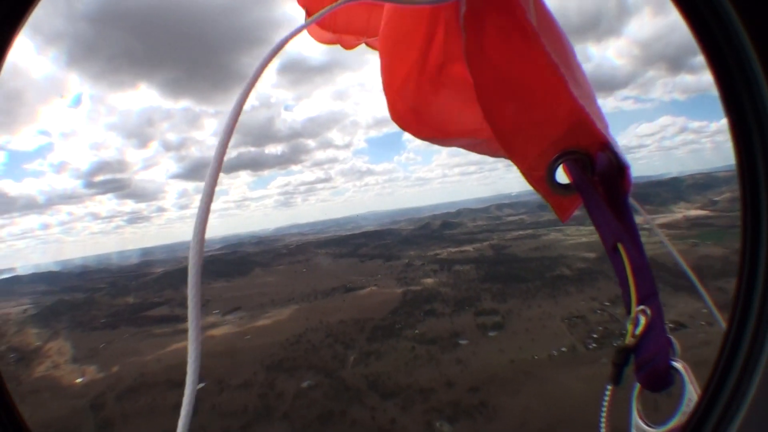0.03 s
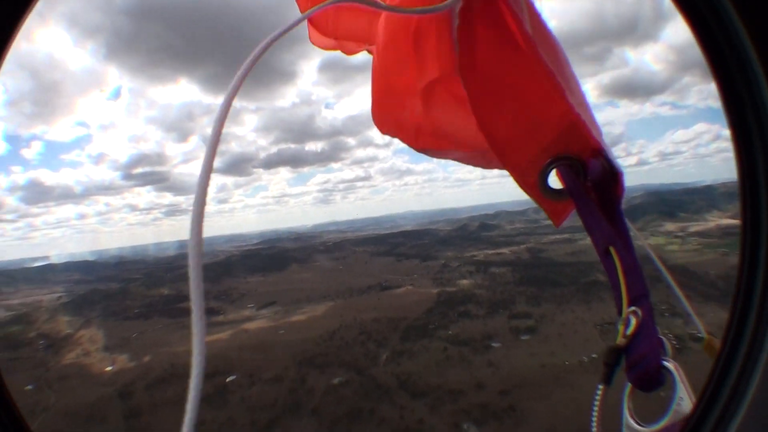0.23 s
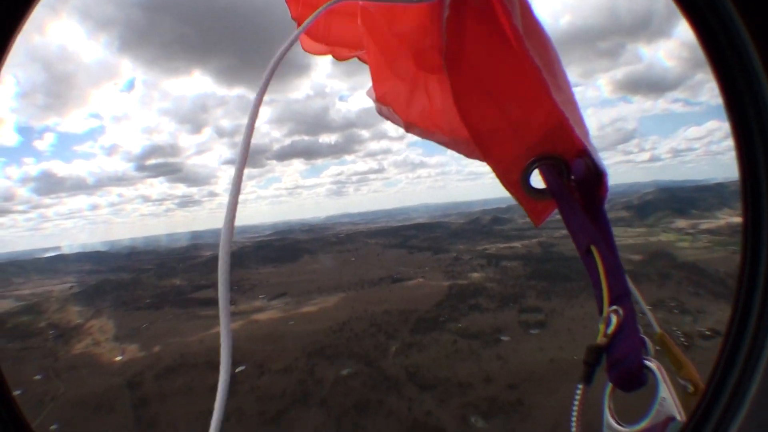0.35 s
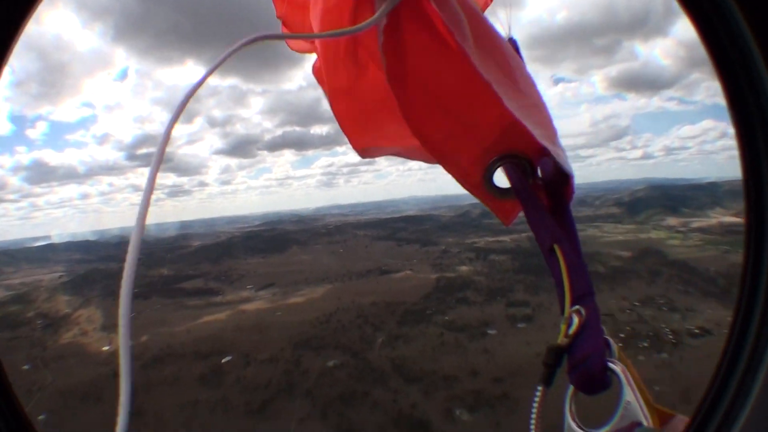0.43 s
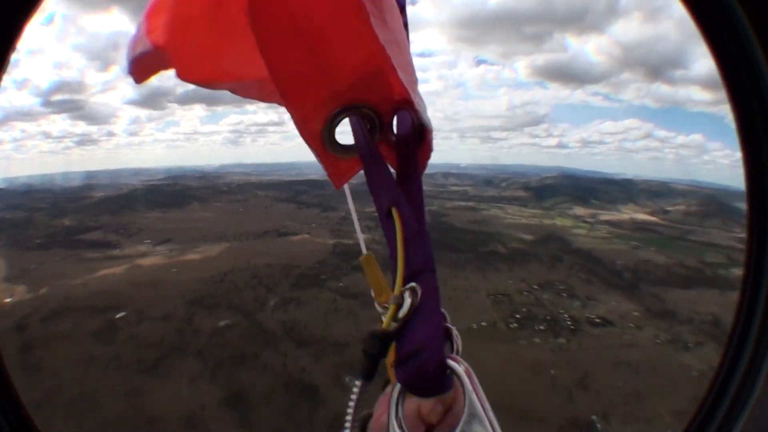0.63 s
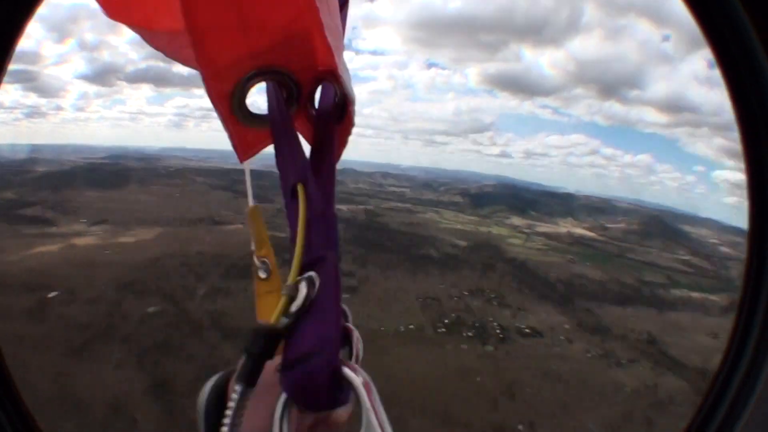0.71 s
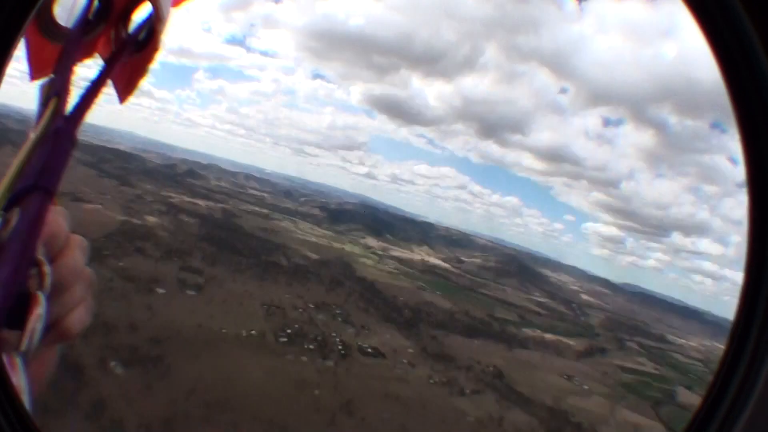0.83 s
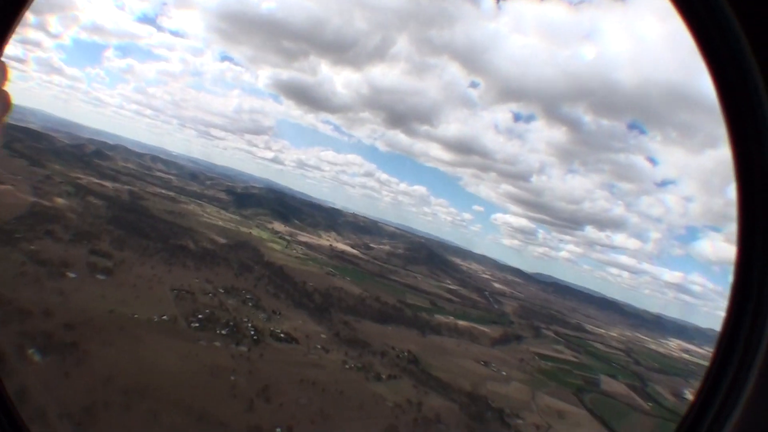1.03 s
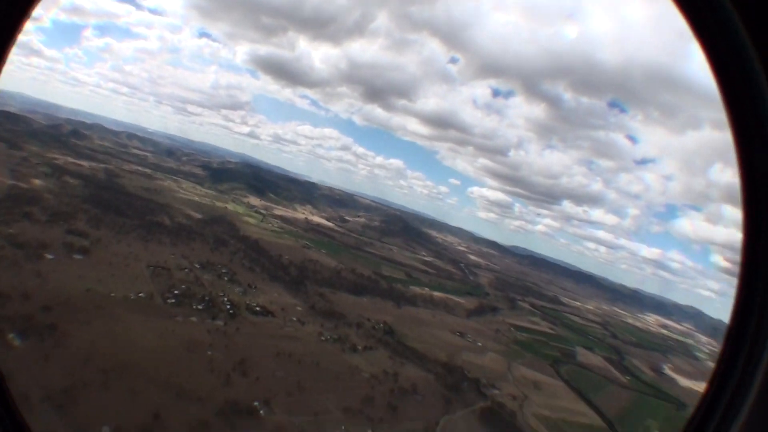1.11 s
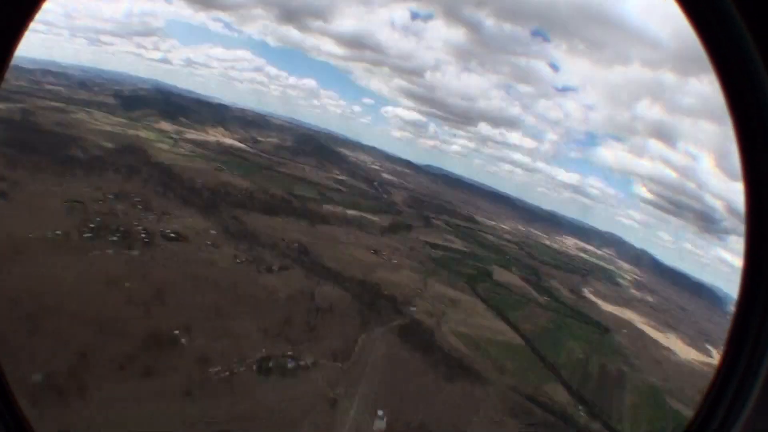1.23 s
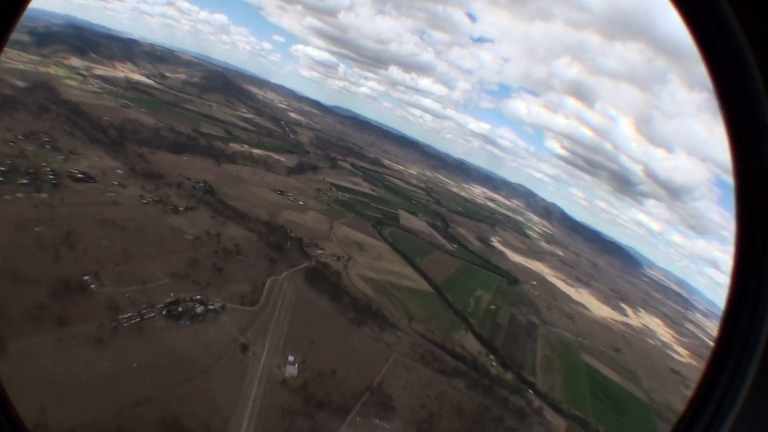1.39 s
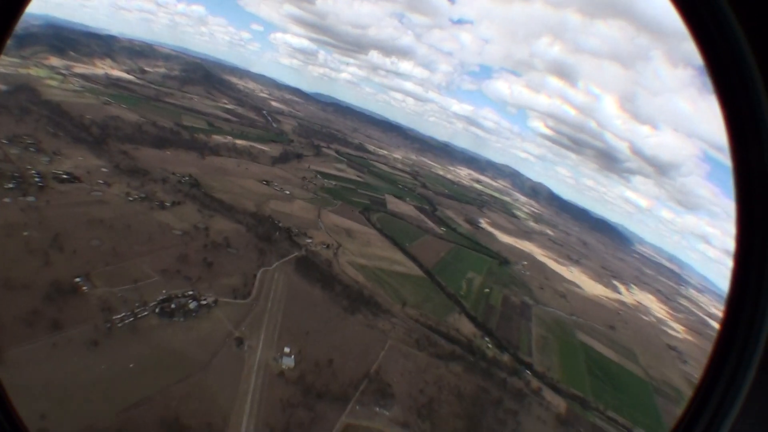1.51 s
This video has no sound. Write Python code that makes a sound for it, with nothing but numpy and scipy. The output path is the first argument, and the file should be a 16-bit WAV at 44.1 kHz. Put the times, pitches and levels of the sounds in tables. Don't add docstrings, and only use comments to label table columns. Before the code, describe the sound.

Wind on a camera worn under a parachute: low lumpy buffeting with buckle ticks and cloth rustles, then a sudden broad roar with bright fizz, easing into a falling whistle over soft hiss, in open sky.

```python
import sys
import numpy as np
from scipy import signal
from scipy.fft import irfft
from scipy.io import wavfile
from scipy.ndimage import uniform_filter1d

SR = 44100
rng = np.random.default_rng(int(sys.argv[2]) if len(sys.argv) > 2 else 0)


def elevation(decibels):
    levels = np.asarray(decibels, float)
    return 10 ** (levels / 20)


def put_to_file(sound):
    columns = np.atleast_2d(sound).T
    safe = np.clip(columns, -1, 1)
    whole_steps = np.round(safe * 32767)
    wavfile.write(sys.argv[1], SR, whole_steps.astype(np.int16))


N = 68355

# start_s, buffeting_db, eddy_speed_ratio, blast_db, blast_brightness_db_per_octave
AIRFLOW = [(0, -34, 1, -72, -2), (.1, -29, 0.9, -72, 0), (.18, -29, 0.71, -70, 0), (.24, -27, 1.27, -55, 2),
           (.34, -28, 0.59, -53.5, 7), (.44, -24.5, 0.81, -40.5, 4), (.5, -25.5, 1.1, -54, 9),
           (.56, -16.5, 2, -21, -4.5), (.61, -14, 2.9, -14, -1.4), (.66, -13.5, 1.74, -16, -1.7),
           (.72, -18.5, 2.45, -16, 1), (.79, -24.5, 1.3, -11.5, -1.5), (.87, -18, 3.3, -13.5, -1.5),
           (.95, -19.5, 1.73, -14.5, -1.13), (1.15, -28.5, 1.3, -15, -1.33), (1.2, -30, 1.8, -22.5, 0.5),
           (1.27, -33.5, 1.4, -24, -1.6), (1.38, -35.5, 1.6, -34, 0.5), (1.55, -38, 0.79, -35, 0)]
# start_s, share_of_wobble_removed (0-1)
EDGE_STEADINESS = [(1.15, .3), (1.4, .7)]
EDGE_WIDTH_HZ, EDGE_SIDE_DB = 155, 1


def evened(x):
    return x / np.sqrt(np.mean(x ** 2) + 1e-20)


def read(points, hz):
    f, value = np.transpose(points)
    return np.interp(np.log(hz + 1), np.log(f + 1), value)


def curve(table, t, axis):
    rows = np.array(table)
    return np.interp(t, rows[:, 0], rows[:, axis])


def air(spectrum, same, size, patchy_db, flicker_db, tilt=None, speed=None, lead=((1, 0), (2, 0))):
    hop = size // 4
    frames = N // hop + 5
    hz = np.fft.rfftfreq(size, 1 / SR)[:, None]
    s = np.arange(frames) * hop / SR
    a, b, c, d, patches = rng.standard_normal((frames, len(hz), 5)).T
    patches = uniform_filter1d(patches, size=size // 100, axis=0)
    patches = evened(uniform_filter1d(patches, size=2600 // hop, axis=1))
    flicker = evened(uniform_filter1d(rng.standard_normal(frames), size=1 + 500 // hop))

    like = np.clip(read(same, hz), -1, 1)
    left = a + 1j * b
    shared = like * left * np.exp(-1j * read(lead, hz))
    z = np.array([left, shared + np.sqrt(1 - like ** 2) * (c + 1j * d)])

    stretch = 1 if speed is None else np.maximum(speed(s), .3)
    shape = elevation(read(spectrum, hz / stretch)) * (hz > 0)
    z *= shape / np.sqrt(np.mean(shape ** 2, axis=0))
    z *= elevation(patchy_db * patches + flicker_db * flicker)
    scale = np.sqrt(np.mean(signal.istft(z, nperseg=size, noverlap=size - hop)[1] ** 2))
    if tilt is not None:
        octaves_up = np.log2(np.maximum(hz / 1500, 1))
        z *= elevation(octaves_up * tilt(s))
    return signal.istft(z, nperseg=size, noverlap=size - hop)[1][:, :N] / scale


def bursts(t, s, length):
    return np.sin(np.pi * np.clip((t - s) / length, 0, 1)) ** 2


def vortex_tone(t, table, width_hz, side_db, steady):
    waver = evened(uniform_filter1d(rng.standard_normal(N), size=700))
    pitch_hz = curve(table, t, axis=1) * (1 + .022 * waver)
    turn = np.exp(2j * np.pi * np.cumsum(pitch_hz) / SR)

    r = np.exp(-np.pi * width_hz / SR)
    noise = rng.standard_normal((2, N)) + 1j * rng.standard_normal((2, N))
    drift = signal.lfilter([1], np.convolve([1, -r], [1, -r]), noise)
    spread = np.mean(drift.real ** 2)

    removed = curve(steady, t, axis=1)
    tone = np.sqrt(2) * (turn * drift / abs(drift) ** removed).real
    mid, side = tone * (2 * spread) ** ((removed - 1) / 2)
    sounding = (t > table[0][0]) * (t <= table[-1][0])
    level = sounding * elevation(curve(table, t, axis=2))
    return level * np.array([mid + elevation(side_db) * side, mid - elevation(side_db) * side])


def canopy_hiss():
    # pitch_hz, level_db (per Hz)
    spectrum = [(800, 5), (2000, -5), (3200, -4), (5000, -4), (8000, -13.5), (11500, -20.5), (15500, -33)]
    # pitch_hz, left_right_likeness (0-1)
    same = [(800, 1), (3000, 0.86), (15000, 0.56)]
    return elevation(-37) * air(spectrum, same, size=512, patchy_db=1.4, flicker_db=1.3)


def rustle(t):
    # start_s, length_s, level_db, thin_crackle_share (0-1)
    rubs = [(0.104, 0.008, -41, .2), (0.135, 0.0033, -33, 0.05), (0.14, 0.0095, -46, 0.3),
            (0.148, .01, -43, 1), (0.208, 0.039, -43.5, 0.44), (.238, .008, -38, .1), (.314, .016, -39, .1),
            (.343, .006, -38, .2), (0.382, 0.0046, -36, .1), (0.397, .012, -31.5, 0.57),
            (0.421, 0.0088, -36, 0.6), (0.434, .016, -31, 0.36), (0.449, 0.021, -29, 0.27),
            (0.473, 0.019, -31, .4), (0.498, 0.0041, -34, 0.1), (0.517, 0.03, -33, 0.35),
            (0.541, 0.0097, -32.5, 0.6), (0.556, 0.0041, -23.5, 0.25), (.571, 0.015, -34, .4),
            (0.594, 0.0061, -27, 0.7), (0.598, 0.048, -26.5, 0.9)]
    # pitch_hz, level_db (per Hz)
    dull_spectrum = [(1500, 7.5), (2800, 14.5), (5000, 8), (9000, -11.5), (13000, -30), (16000, -42)]
    # pitch_hz, level_db (per Hz)
    thin_spectrum = [(2500, -7), (6000, 3.5), (10000, -1), (13500, -18), (16000, -28)]
    snaps = rng.random(N) < 8000 / SR
    snaps = snaps * elevation(2.6 * np.minimum(rng.exponential(1, N), 3))
    snaps = snaps * rng.choice([-1, 1], N)
    hz = np.fft.rfftfreq(128, 1 / SR)

    def coloured(spectrum):
        ring = np.roll(irfft(elevation(read(spectrum, hz))), 64) * np.hanning(128)
        return evened(np.convolve(snaps, ring, "same"))

    dull, thin = coloured(dull_spectrum), coloured(thin_spectrum)
    cloth = np.zeros(N)
    for s, length, db, share in rubs:
        mix = dull + np.clip(share, 0, 1) * (thin - dull)
        cloth += elevation(db) * np.sqrt(bursts(t, s, length)) * mix
    return np.array([cloth, 0.98 * cloth + 0.079 * np.roll(cloth, 40)])


def ticks():
    # start_s, peak_db, centre_hz, spread_octaves
    knocks = [(.0977, -17, 8000, 1.1), (.1407, -15.5, 7500, .8), (.1427, -17, 5000, .45),
              (.1862, -26, 4000, 1), (.234, -21, 3200, .9), (.248, -24, 4500, .5), (.3245, -23, 3800, .6),
              (.345, -29, 6500, .6), (.378, -22, 4500, .6), (.4328, -21, 4000, .9), (.456, -25, 4500, .7),
              (.4603, -15.5, 4200, .7), (.4965, -31, 10000, .5), (.516, -21, 3200, .5),
              (.547, -26, 8000, .8), (.5585, -22, 3800, .7), (.6205, -20, 10000, .8),
              (1.4443, -33, 14000, .5)]
    t60_s, rise_s = .0045, .00015
    out, t = np.zeros(N), np.arange(600) / SR
    for (s, db, centre, spread), luck in zip(knocks, rng.random((len(knocks), 3, 30, 1))):
        f = np.geomspace(1800, 15000, 30)[:, None] * (.96 + .08 * luck[0])
        weight = np.exp(-(np.log2(f / centre) / spread) ** 2 / 2)
        decay = elevation(-60 * t / (t60_s * (.5 + luck[1])))
        ring = (weight * decay * np.cos(2 * np.pi * f * t - 4 * luck[2])).sum(0)
        ring *= 1 - np.exp(-(t / rise_s) ** 2)
        part = out[round((s - rise_s) * SR):][:len(t)]
        part += (elevation(db) * ring / abs(ring).max())[:len(part)]
    return out * elevation([[-1.1], [1.1]])


def puffs(t):
    # middle_s, level_db, length_s, left_right_db
    gusts = [
        (0.025, -23.5, 0.034, 2),
        (0.197, -29, 0.04, 1),
        (0.237, -27, 0.078, -5),
        (0.285, -29, 0.047, -2),
        (0.358, -25, 0.052, -2.5),
        (0.415, -23.5, 0.0074, 16),
        (0.441, -26, 0.07, -4.5),
        (0.517, -43, 0.016, -5),
    ]
    # pitch_hz, level_db (per Hz)
    spectrum = [(100, 9.5), (400, 10), (900, -2.5), (1500, -1.5), (2500, -44)]
    level = 0
    for s, db, length, pan in gusts:
        ports = elevation(db + np.array([[pan], [-pan]]) / 2)
        level = level + ports * bursts(t, s - length / 2, length)
    opposed = [(100, -0.77), (1500, -0.63)]  # pitch_hz, left_right_likeness
    return level * air(spectrum, opposed, size=512, patchy_db=0.0, flicker_db=3.5)


def fizz(t):
    # start_s, level_db
    flare = [(0, -64), (.38, -58), (.58, -56), (.618, -39), (.65, -33.5), (.694, -33), (.75, -33),
             (.768, -40), (.802, -32), (.87, -33.5), (.95, -45), (1.2, -52), (1.3, -46), (1.42, -58),
             (1.55, -63)]
    # pitch_hz, level_db (per Hz)
    spectrum = [(4000, -18), (6500, 2.5), (9000, -1), (12000, -9), (15800, -17)]
    sizzle = air(spectrum, [(5000, .85), (12000, .97)], size=256, patchy_db=.6, flicker_db=1.8)
    return elevation(curve(flare, t, axis=1)) * sizzle


def strap_tone(t):
    # start_s, pitch_hz, level_db
    path = [(0.739, 780, -35), (0.764, 850, -23), (.8, 1250, -24), (.83, 1300, -28), (.86, 1250, -41),
            (1.27, 1250, -50), (1.31, 1300, -35), (1.36, 1400, -33), (1.39, 1390, -36)]
    return vortex_tone(t, path, EDGE_WIDTH_HZ, EDGE_SIDE_DB, EDGE_STEADINESS)


def cavity_moan(t):
    # start_s, pitch_hz, level_db
    path = [(.5, 59.84, -36), (0.541, 85.8, -21.5), (.58, 132.6, -24.5), (.605, 217.3, -23),
            (0.629, 249, -14.5), (.66, 153.3, -16.5), (0.691, 188.5, -22), (0.704, 221.5, -17),
            (.735, 239.6, -18), (0.771, 231.4, -43), (0.851, 162.5, -18)]
    # start_s, share_of_wobble_removed (0-1)
    steady = [(0, .9), (2, .9)]
    return vortex_tone(t, path, width_hz=30, side_db=-12.5, steady=steady)


def edge_whistle(t):
    # start_s, pitch_hz, level_db
    path = [(.72, 2250, -45), (0.791, 2260, -20), (0.849, 2156, -34), (.97, 1960, -34), (.995, 1934, -23),
            (1.1, 1787, -24.5), (1.158, 1521, -23.5), (1.185, 1500, -41), (1.23, 1720, -41),
            (1.269, 1950, -37), (1.315, 1760, -36), (1.349, 1690, -35), (1.379, 1506, -31),
            (1.44, 1464, -31), (1.466, 1373, -36), (1.491, 1272, -27), (1.525, 1220, -30.5),
            (1.55, 1276, -28)]
    return vortex_tone(t, path, EDGE_WIDTH_HZ, EDGE_SIDE_DB, EDGE_STEADINESS)


def buffeting(t):
    # pitch_hz, level_db (per Hz)
    spectrum = [(15, -42), (30, -10.5), (60, -4.5), (110, -4), (200, -7), (400, -16.5), (1000, -29),
                (2500, -36.5)]
    # pitch_hz, left_right_likeness (0-1)
    same = [(30, 0.72), (60, 1), (130, 0.78), (290, 0.58), (640, 0.16), (1400, 0.26)]
    rumble = air(spectrum + [(5000, -65)], same, size=1024, patchy_db=0.54, flicker_db=-0.5,
                 speed=lambda s: curve(AIRFLOW, s, axis=2))
    return elevation(curve(AIRFLOW, t, axis=1)) * rumble


def blast(t):
    # pitch_hz, level_db (per Hz)
    spectrum = [(60, -27), (200, -7.5), (600, -3), (1400, -2.5), (2400, -9), (3500, -12.5), (8000, -22.5),
                (15500, -45.5)]
    # pitch_hz, left_right_likeness (0-1)
    same = [(100, 1), (400, 0.43), (1100, 0.97), (2400, 0.26), (4000, 0.95), (8000, 0.44), (12000, 0.99)]
    # pitch_hz, shift_radians
    port_shift = [(260, -1), (1100, -2), (1800, -2.5), (3700, -1.6), (6000, -1.16), (10000, -1), (15400, 1)]
    roar = air(spectrum, same, size=512, patchy_db=1.5, flicker_db=0.65,
               tilt=lambda s: curve(AIRFLOW, s, axis=4), lead=port_shift)
    return elevation(curve(AIRFLOW, t, axis=3)) * roar


def scene():
    t = np.arange(N) / SR
    harness = rustle(t) + ticks()
    tones = strap_tone(t) + cavity_moan(t) + edge_whistle(t)
    wind = canopy_hiss() + puffs(t) + fizz(t) + buffeting(t) + blast(t)
    return harness + tones + wind


def roll_off(x):
    return signal.sosfilt(signal.butter(12, 15850, fs=SR, output="sos"), x)


def record(dry):
    low_cut = signal.butter(2, 41, "high", fs=SR, output="sos")
    cut = signal.sosfilt(low_cut, dry)
    treble_limit = signal.firwin(511, 15720, window=("kaiser", 9), fs=SR)
    band = signal.oaconvolve(cut, treble_limit[None], "same")
    mix = np.clip(band, -1, 1)
    return roll_off(mix)


dry = scene()
out = record(dry)
put_to_file(out)
```